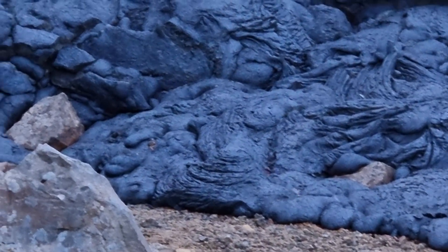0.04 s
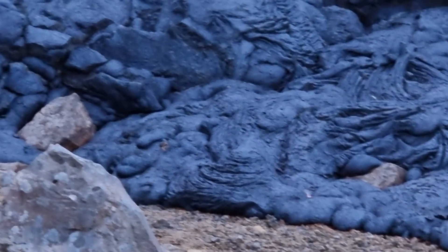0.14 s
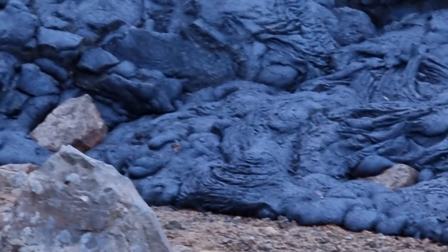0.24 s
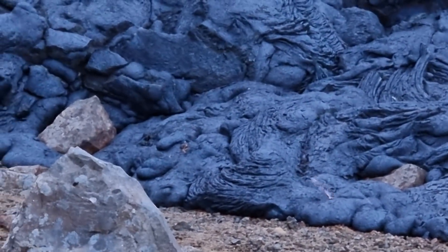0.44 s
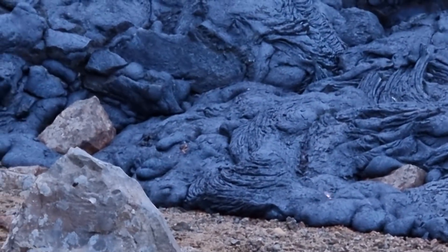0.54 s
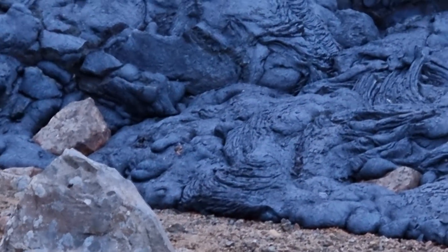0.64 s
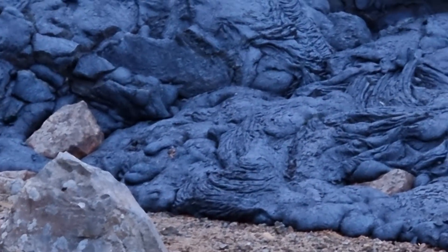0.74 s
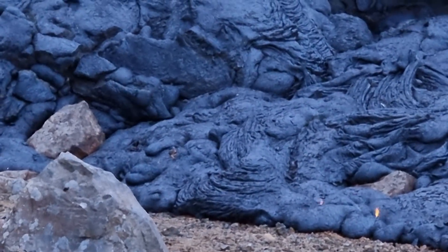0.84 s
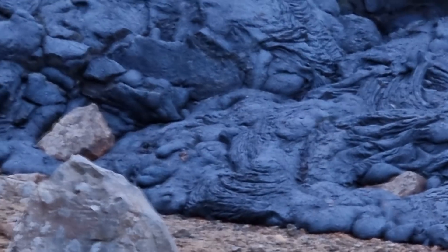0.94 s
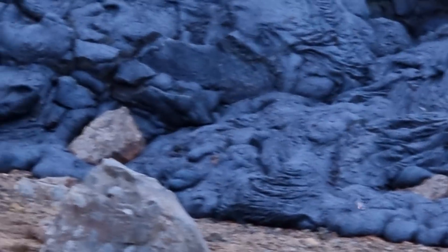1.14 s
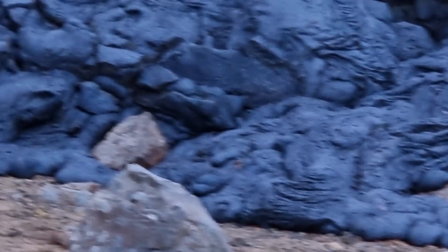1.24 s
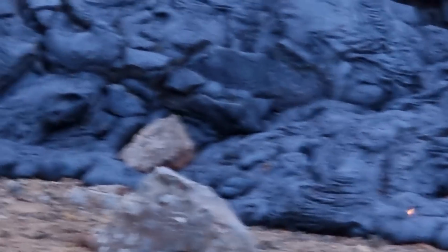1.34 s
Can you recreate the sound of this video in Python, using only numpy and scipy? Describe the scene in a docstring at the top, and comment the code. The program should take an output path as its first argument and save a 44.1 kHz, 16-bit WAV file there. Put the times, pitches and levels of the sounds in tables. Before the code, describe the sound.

A foot scuffs and crunches down on gravel close by, in light wind.

```python
"""Outdoors on coarse gravel, close to the feet, on a hand-held camera's stereo microphone.
Light wind rumbles on the ports throughout, over a murmur of open air and a faint hiss.
Clothing rustles and a foot scuffs (0.2-0.4 s), then slides (0.56 s), grinding the small stones.
At 0.7 s the weight lands in a heavy crunch: stones crack and knock together, and the ground thuds.
Wind buffets the ports (0.8-0.95 s) over a second tread, and a few light cracks and thuds trail off."""
import sys
import numpy as np
from scipy import signal
from scipy.fft import rfft, irfft, next_fast_len
from scipy.io import wavfile

SR = 44100
rng = np.random.default_rng(int(sys.argv[2]) if len(sys.argv) > 2 else 0)


def to_wav(s):
    """Save 16-bit WAV."""
    ch = np.atleast_2d(s).T  # columns
    pcm = np.round(np.clip(ch, -1, 1) * 32767)  # PCM
    wavfile.write(sys.argv[1], SR, pcm.astype(np.int16))


N = 61739


def amp(db):
    """Decibels to gain."""
    return 10 ** (np.asarray(db) / 20)


def unit(x):
    """Scale to rms 1."""
    return x / np.sqrt(np.mean(x ** 2) + 1e-20)


def along(points, hz):
    """Read (f/Hz, value) points on a log frequency axis."""
    f, v = np.transpose(points)
    return np.interp(np.log(hz + 1), np.log(f + 1), v)


def envelope(points):
    """One gain per sample from (t/s, level/dB) points."""
    return amp(np.interp(np.arange(N) / SR, *np.transpose(points)))


def pan(db):
    """Stereo gains for a pan given as left minus right in dB."""
    gains = amp(np.array([[.5], [-.5]]) * db)
    return gains / np.sqrt(np.mean(gains ** 2, axis=0))


def colour(x, gain_db):
    """Minimum-phase filter with the response gain_db(hz)."""
    m = 2 * next_fast_len(x.shape[-1])
    cepstrum = irfft(np.log(amp(gain_db(np.fft.rfftfreq(m, 1 / SR)))), m)
    cepstrum[..., 1:m // 2] *= 2
    cepstrum[..., m // 2 + 1:] = 0
    return irfft(rfft(x, m) * np.exp(rfft(cepstrum)), m)[..., :x.shape[-1]]


def noise(spectrum, shared):
    """Coloured stereo noise of rms 1; shared weights the part common to both sides."""
    white = rng.standard_normal((3, N))
    return unit(colour(white[:2] + shared * white[2], lambda hz: along(spectrum, hz)))


def add(out, start_s, sound):
    """Mix a sound in at a time."""
    i = max(round(start_s * SR), 0)
    out[:, i:i + sound.shape[-1]] += sound[..., :max(N - i, 0)]


def cracks(size=2048):
    """Stones give way: tiny slips build to a main slip and die away, coloured by each stone's pitch."""
    # t/s, level/dB, rise and fall/s, tilt/(dB per octave), pitch f/Hz, pan/dB
    stones = [(.201, -41.5, 0.0027, -6.5, 2500, 27), (0.2243, -48, 0.0045, -1, 1800, -1.5),
              (0.332, -41.5, 0.0055, -1.6, 3200, -7), (0.347, -49.5, 0.0089, 4, 3000, -5),
              (0.3762, -36.5, .0012, -0.76, 1220, -3.5), (0.368, -44, 0.0025, -1.5, 2200, -1),
              (0.561, -45.5, 0.001, 0.5, 5500, 7), (.591, -47, 0.0041, 1, 400, 0),
              (0.633, -55.5, 0.0018, 2.5, 3800, 16), (0.702, -41.5, 0.0028, 1, 2000, -13),
              (0.7045, -26.5, 0.00084, 0, 400, -8), (0.7084, -27.5, 0.0021, 1.26, 1500, -1.5),
              (0.722, -33, 0.002, -0.5, 2700, -3), (0.732, -34.5, 0.0013, 2, 500, -11.5),
              (0.7362, -29.5, .001, -2, 3100, -1.5), (.749, -41, 0.0042, -2, 3000, -2),
              (0.7637, -37, 0.004, 1.5, 550, -2), (0.8114, -41, 0.0013, 0.5, 3300, -4),
              (0.8335, -31, 0.0015, -1.9, 1690, -2.5), (.9045, -55, 0.0013, 6.7, 1360, -3),
              (.919, -53, 0.0012, 3.5, 1500, -0.5), (.9602, -47, 0.0011, -2, 1050, 3),
              (1.1367, -51, 0.0015, 1.9, 1100, 0), (1.33, -47, 0.0011, -4, 700, -15)]
    # body of a stone: f/Hz, level/dB
    body = [(80, -12.5), (230, 6.5), (450, 0), (800, -5.5), (1500, -10.5), (2100, -17.5), (3050, -15),
            (3900, -23.5), (5600, -21), (7600, -34.5), (8800, -39.5), (15000, -78)]
    slip_share, main_slip = .4, 0.62  # share of samples that slip; main slip over all the others
    peak_db, peak_octaves = 10, 0.52  # height and width of the stone's resonance
    out = np.zeros((2, N))
    t = (np.arange(size) - size // 4) / SR
    impulse = 1. * (t == 0)
    for at, db, length, tilt, pitch, side in stones:
        def tone(hz):
            resonance = peak_db * np.exp(-(np.log2((hz + 1) / pitch) / peak_octaves) ** 2)
            return along(body, hz) + tilt * np.log2(hz + 100) + resonance

        slips = rng.standard_normal(size) * (rng.random(size) < slip_share)
        slips *= np.exp(-np.abs(t) / length)
        force = slips / (np.linalg.norm(slips) + 1e-9) + main_slip * impulse
        burst = colour(contacts(force), tone) / np.linalg.norm(colour(impulse, tone))
        add(out, at + t[0], amp(db) * burst * np.sqrt(0.0024 * SR) * pan(side))
    return out


def grinding(size=400):
    """Small stones tick densely and ring briefly, louder as the sole presses and slides."""
    # grinding under the sole: t/s, level/dB
    pressing = [(0, -55.5), (.07, -81), (.13, -56.5), (.225, -56), (.255, -64.5), (.324, -57), (.334, -43),
                (.385, -52.5), (.41, -66.5), (.548, -69.5), (.562, -45.5), (.61, -52), (.66, -47.5),
                (.695, -49), (.73, -43), (.765, -42.5), (.795, -53.5), (.835, -45), (.865, -57.5),
                (1.0, -68), (1.14, -62), (1.19, -70.5), (1.33, -56), (1.4, -61)]
    # tone of the gravel bed: f/Hz, level/dB
    bed = [(60, -13), (170, 8.5), (260, -1), (420, -11.5), (650, -5), (900, -10), (1500, -14),
           (2100, -20.5), (3050, -24), (3900, -29), (5600, -24.5), (7600, -40), (8800, -74), (15000, -66)]
    grains_per_s, scatter_db = 1800, 4
    centre_hz, spread_octaves, t60_cycles, ring_gain = 2200, 0.89, 14.5, 0.28
    when, strength, pitch, sign = rng.random((int(grains_per_s * N / SR), 4)).T
    start = (when * N).astype(int)
    gain = amp(scatter_db * np.minimum(-np.log(1 - strength), 4)) * np.sign(sign - .5)
    grain_hz = centre_hz * 2 ** (spread_octaves * np.sqrt(3) * (2 * pitch[:, None] - 1))
    cycles = grain_hz * np.arange(size) / SR
    rings = gain[:, None] * amp(-60 * cycles / t60_cycles) * np.sin(2 * np.pi * cycles)
    rings *= np.sqrt(grain_hz / SR)  # evens out the energy across pitches
    ringing = np.bincount((start[:, None] + np.arange(size)).ravel(), rings.ravel(), N)[:N]
    ticks = contacts(np.bincount(start, gain, N))
    gravel = colour(ticks + ring_gain * ringing, lambda hz: along(bed, hz))
    return unit(gravel) * envelope(pressing) * pan(db=-3.5)


def contacts(force):
    """Stone contacts reach the two ports nearly alike in the bass, differently in the treble."""
    # part that the ports do not share: f/Hz, level/dB
    spread = [(200, -13), (1000, -14), (2500, -8), (5000, -5.5), (10000, -12)]
    # where the crunch sits between the ports: f/Hz, pan/dB
    balance = [(200, 0.5), (1000, 1.5), (2500, 0), (3700, 2.5), (5000, -5.5), (7000, -6.5), (9000, -0.5),
               (14000, 12)]

    def port_db(hz):
        added_db = 10 * np.log10(1 + amp(along(spread, hz)) ** 2)  # power the unshared part adds
        return np.array([[.5], [-.5]]) * along(balance, hz) - added_db

    unshared = colour(force * rng.standard_normal((2, len(force))), lambda hz: along(spread, hz))
    return colour(force + unshared, port_db)


def knocks(size=2048, rise_s=0.00059):
    """Loose pebbles knock dully, each ringing for only a few cycles."""
    # t/s, relative level/dB, f/Hz, pan/dB
    pebbles = [(.0408, -36, 447, 0), (.6868, -21.5, 378, -21), (.8788, -41.5, 780, 1), (.9597, -30, 850, 4)]
    # a pebble's modes: multiple of the pitch, level/dB, t60/s
    modes = [(1, -1.5, 0.0092), (2.05, -22, 0.013), (3.14, -8.5, 0.0024)]
    out, t = np.zeros((2, N)), np.arange(size) / SR
    for at, db, hz, side in pebbles:
        ring = sum(amp(level - 60 * t / t60) * np.sin(2 * np.pi * hz * k * t) for k, level, t60 in modes)
        add(out, at, amp(db + 4) * ring * (1 - np.exp(-t / rise_s)) * pan(side))
    return out


def thumps(size=16384):
    """Low, damped thumps: footfalls on the ground, and wind buffeting the ports around 0.8-0.95 s."""
    # t/s, level/dB, f/Hz, rise/s, t60/s, pan/dB
    low_thumps = [(0.202, -32.5, 131.4, 0.0027, 0.1, 27), (0.337, -37, 167, 0.01, 0.16, 6),
                  (.378, -36.5, 150, 0.0013, 0.065, -4), (0.71, -17, 124, 0.00052, 0.025, 1),
                  (.724, -20, 130, 0.00078, 0.046, 3.5), (.705, -29, 229, 0.001, 0.17, -4),
                  (.695, -21, 68.6, 0.023, 0.19, -2), (.765, -33, 176, 0.0012, 0.087, 3.5),
                  (0.814, -24, 78.05, 0.0048, 0.22, 3), (0.835, -20, 79.8, 0.005, .2, 17.5),
                  (0.837, -18.5, 142, 0.0014, 0.028, 3), (0.912, -28, 68.3, 0.0055, 0.24, -27),
                  (1.145, -36, 167, 0.00034, 0.04, -5), (1.39, -32, 204, 0.0016, 0.031, 12)]
    out, t = np.zeros((2, N)), np.arange(size) / SR
    for at, db, hz, rise, t60, side in low_thumps:
        level = amp(db - 60 * t / t60) * (1 - np.exp(-t / rise))
        add(out, at, level * np.sin(2 * np.pi * hz * t) * pan(side))
    return out


def rustles():
    """Clothing near the microphone brushes in thin, bright swells."""
    # peak t/s, level/dB, rise/s, fall/s, pan/dB
    brushes = [(0.087, -57, 0.0018, 0.0082, -9), (0.161, -59.5, 0.0024, 0.0094, -4),
               (.173, -57, 0.0015, 0.002, -8), (.23, -69, 0.15, 0.16, 2), (.293, -67.5, 0.0021, .008, -7),
               (.562, -55, .003, 0.0033, -2), (0.57, -66, 0.0018, 0.0054, -9),
               (.59, -73.5, 0.023, 0.27, 5.5), (0.689, -60, 0.00083, 0.0018, -8.5),
               (.919, -65, 0.004, 0.0043, -1)]
    # tone of the cloth: f/Hz, level/dB
    cloth = [(1000, -16), (2000, -2.5), (3200, -1), (4400, -8), (6000, 4), (8050, -5.5), (8600, -14),
             (10700, -9), (12500, -2), (15500, -3.5)]
    t = np.arange(N) / SR
    swells = sum(amp(db) * np.exp(np.minimum((t - at) / rise, (at - t) / fall)) * pan(side)
                 for at, db, rise, fall, side in brushes)
    return swells * noise(cloth, shared=0.26)


def port_delay(x, lag_s=.00005):
    """The feet are a little nearer the right port, so the left hears them later."""
    m = next_fast_len(N + 1024)
    phase = np.pi * np.fft.rfftfreq(m, 1 / SR) * lag_s * np.array([[-1], [1]])
    return irfft(rfft(x, m) * np.exp(1j * phase), m)[:, :N]


def rock_scatter(x, size=8192, t60_s=0.075):
    """The ground and boulders around return a short, diffuse answer."""
    # tone of the reflections: f/Hz, level/dB
    rock = [(200, -0.5), (1000, -1.5), (3000, 6), (6000, -0.5), (12000, 3.5)]
    tail = rng.standard_normal((2, size)) + 0.84 * rng.standard_normal(size)
    tail *= amp(-60 * np.arange(size) / SR / t60_s)
    tail = colour(tail / np.linalg.norm(tail[0]), lambda hz: along(rock, hz))
    return signal.fftconvolve(x, tail, axes=1)[:, :N]


def wind():
    """Light gusts rumble on the microphone ports, more on the left."""
    # t/s, level/dB
    gusts = [(0, -55), (.08, -43), (.16, -41.5), (.22, -39.5), (.26, -42.5), (.3, -35.5), (.39, -49.5),
             (.44, -52), (.52, -50), (.58, -43), (.68, -52.5), (.8, -44), (.97, -45.5), (1.04, -45.5),
             (1.11, -40.5), (1.19, -52), (1.28, -50), (1.4, -49.5)]
    # f/Hz, level/dB
    rumble = [(15, -6.5), (35, 0), (70, -0.5), (100, -7.5), (160, -15.5), (230, -27.5), (400, -43.5),
              (1000, -40.5), (4000, -112)]
    return envelope(gusts) * noise(rumble, shared=.3) * pan(db=8)


def open_air():
    """The place itself: a low murmur, nearly alike at both ports."""
    # t/s, level/dB
    swell = [(0, -59.5), (.3, -61.5), (.5, -65.5), (.62, -57), (.9, -63), (1.1, -57), (1.4, -58)]
    # f/Hz, level/dB
    murmur = [(40, -13), (150, 3.5), (240, 5.5), (340, -6.5), (600, -8.5), (1200, -23.5), (2500, -42),
              (5000, -47), (12000, -64)]
    return envelope(swell) * noise(murmur, shared=3.35) * pan(db=-0.5)


def microphone_hiss():
    """The microphone's own faint, steady noise."""
    # f/Hz, level/dB
    hiss = [(500, 11), (2500, -2.5), (3600, -3), (4700, -6), (6300, 5), (7400, -4.5), (8500, -17.5),
            (10500, -10), (13000, -4), (15500, -5)]
    return amp(-71) * noise(hiss, shared=0.091) * pan(db=7.5)


def scene():
    """Close footwork in the gravel, with rocks and wind around it."""
    stones = port_delay(grinding() + cracks()) + knocks()
    foreground = stones + amp(-11) * rock_scatter(stones) + thumps() + rustles()
    return foreground + wind() + open_air() + microphone_hiss()


def record(dry):
    """The camera keeps nothing above its band limit."""
    top_hz = 15850
    m = next_fast_len(N + SR // 2)
    passband = np.fft.rfftfreq(m, 1 / SR) < top_hz
    return irfft(rfft(dry, m) * passband, m)[:, :N]


dry = scene()
out = record(dry)
to_wav(out)
```